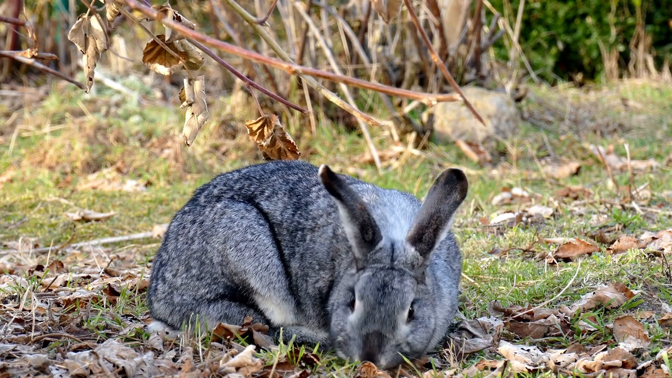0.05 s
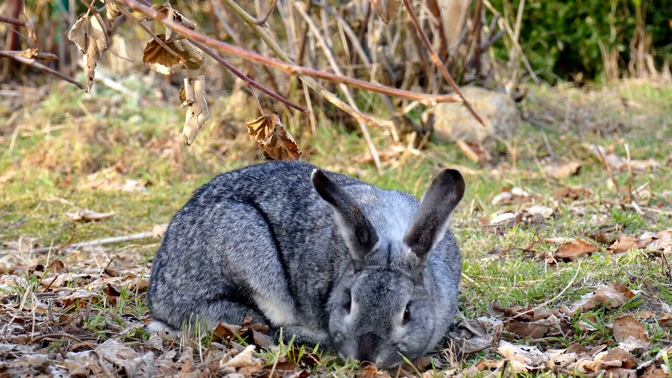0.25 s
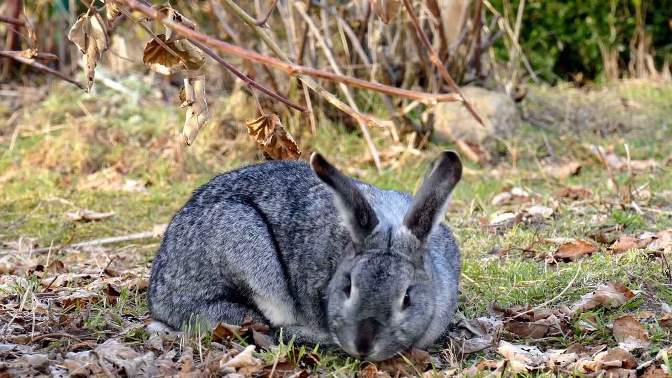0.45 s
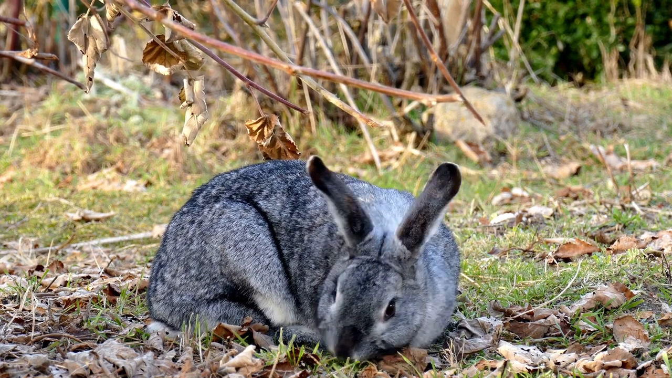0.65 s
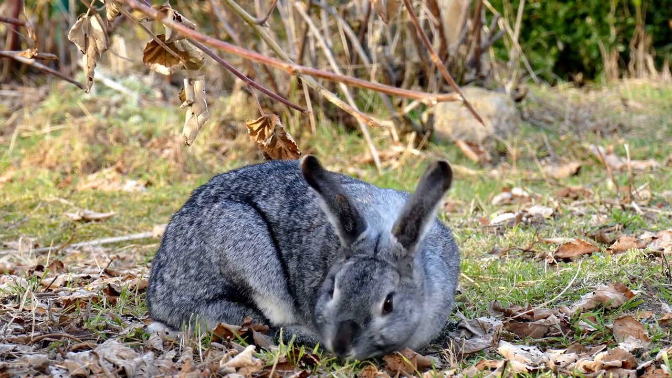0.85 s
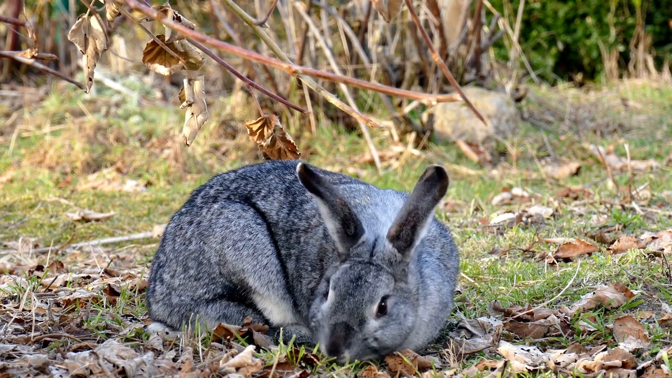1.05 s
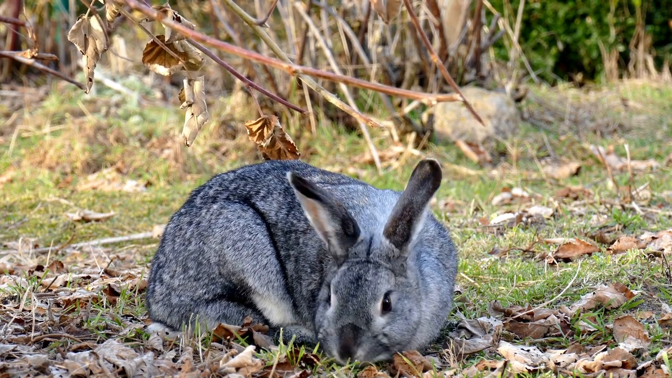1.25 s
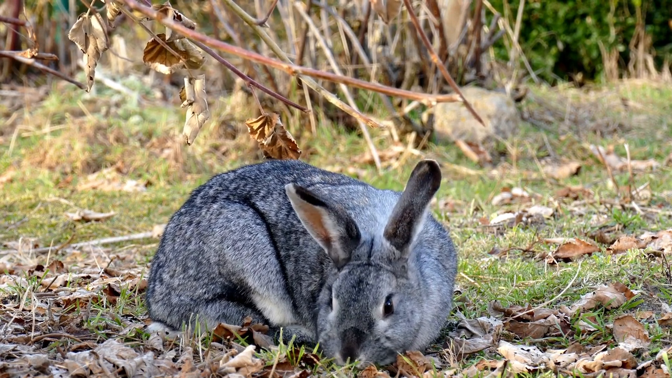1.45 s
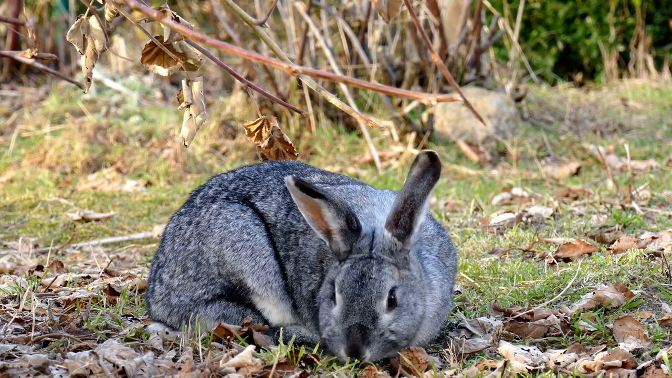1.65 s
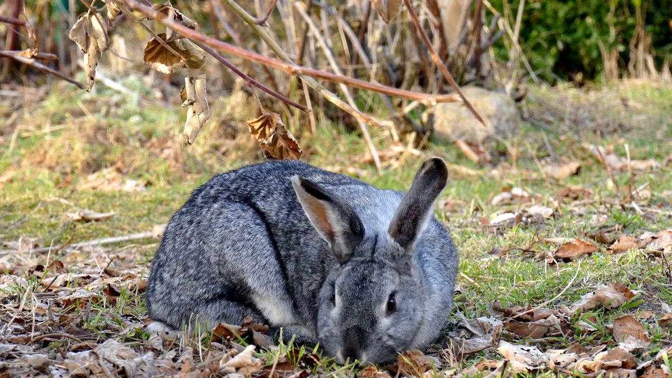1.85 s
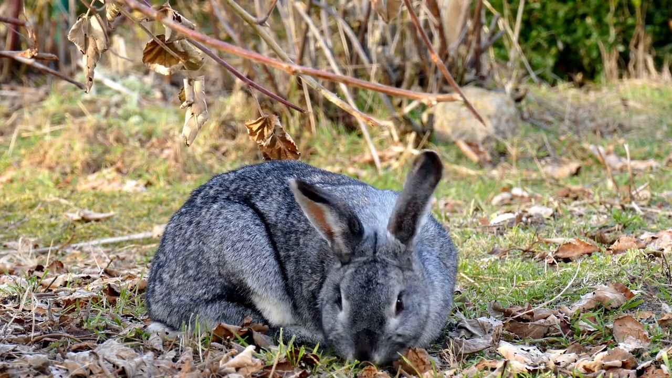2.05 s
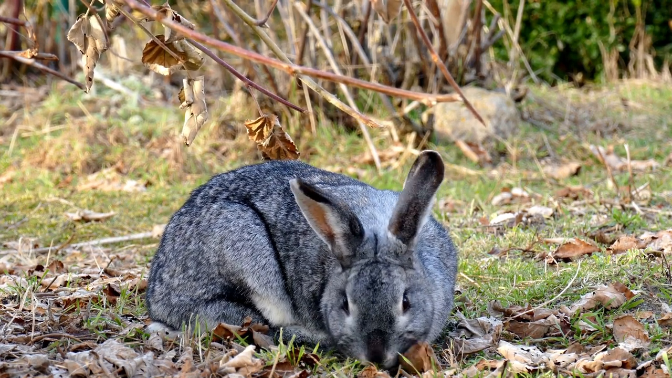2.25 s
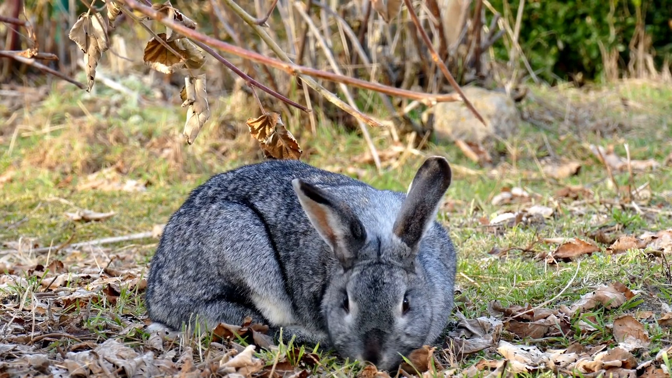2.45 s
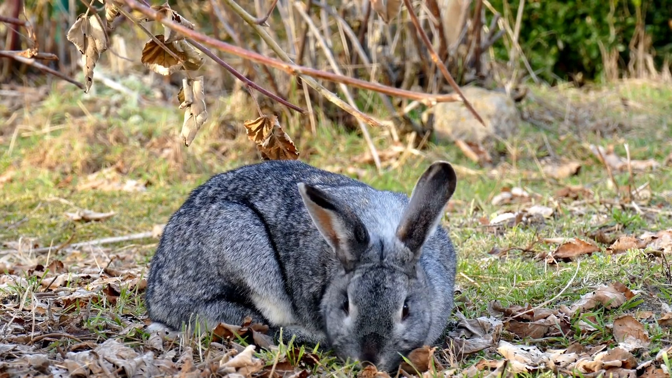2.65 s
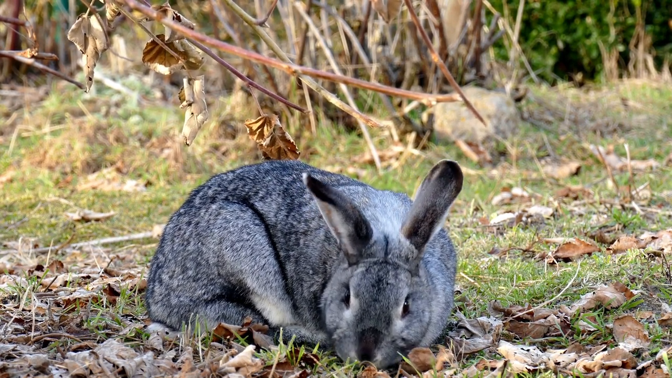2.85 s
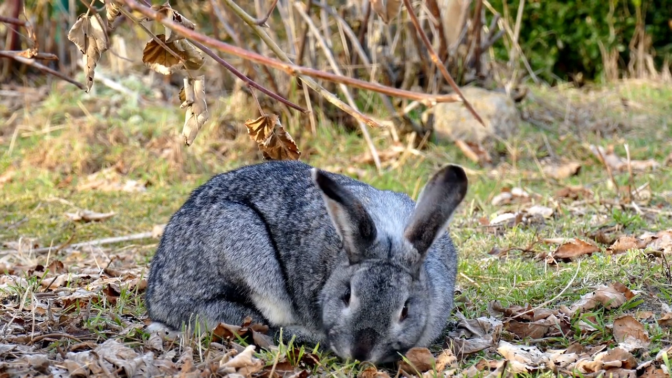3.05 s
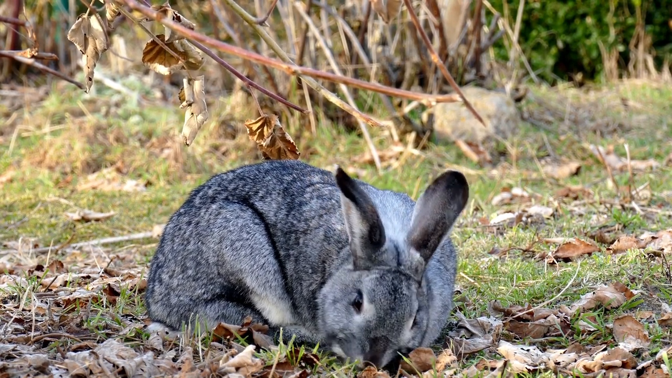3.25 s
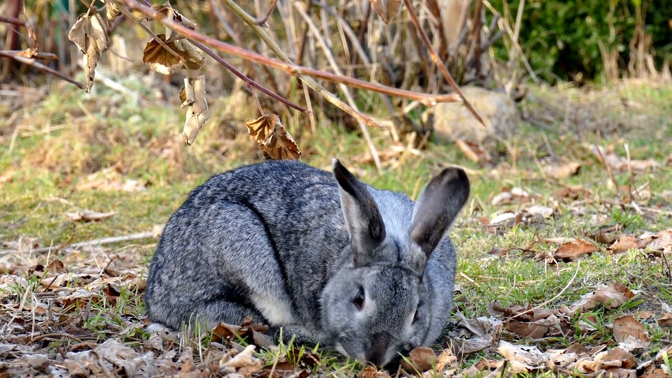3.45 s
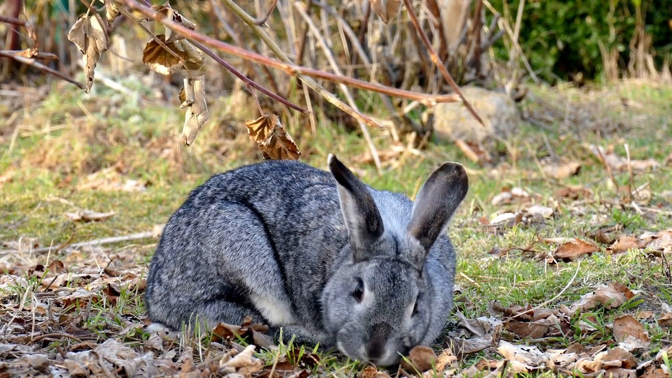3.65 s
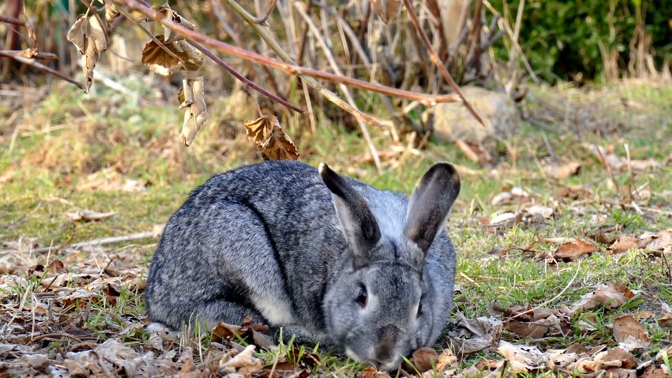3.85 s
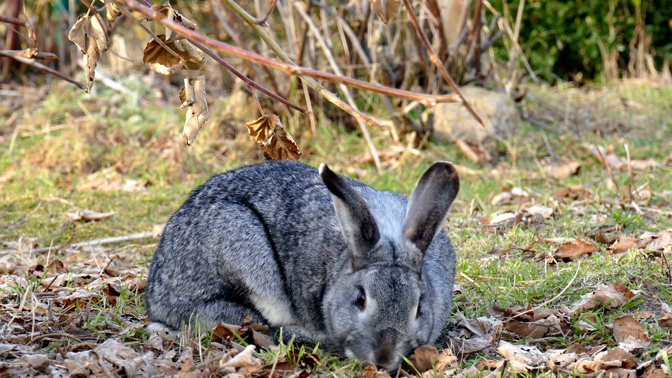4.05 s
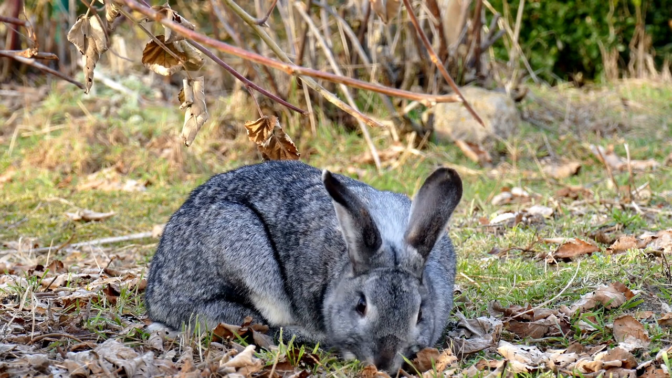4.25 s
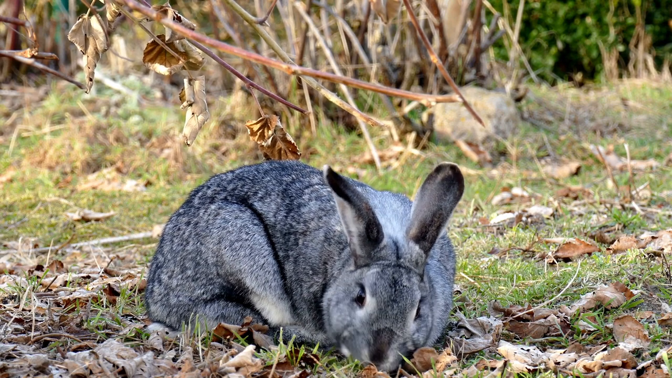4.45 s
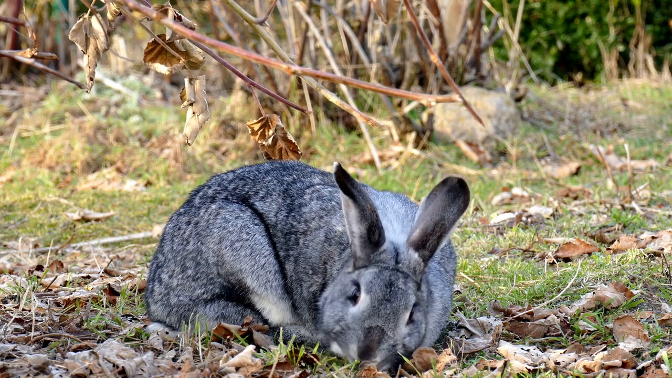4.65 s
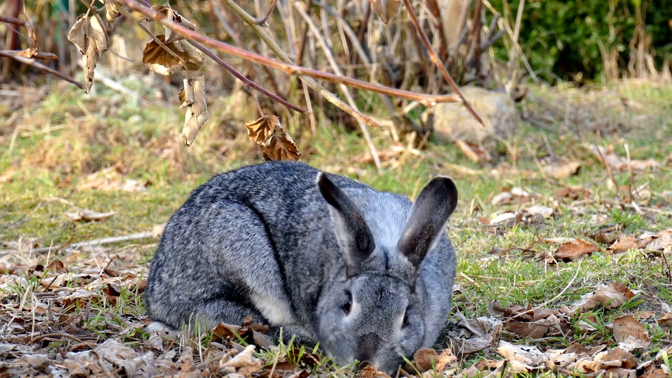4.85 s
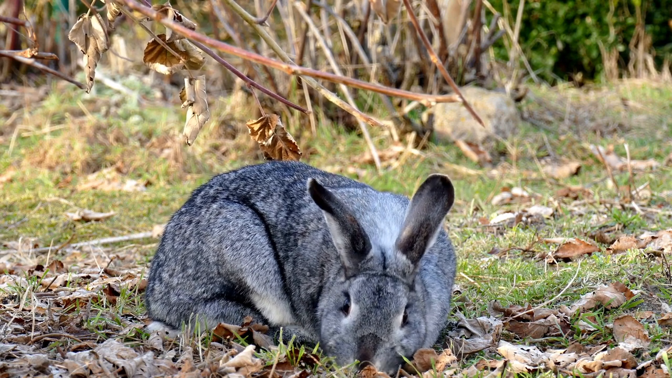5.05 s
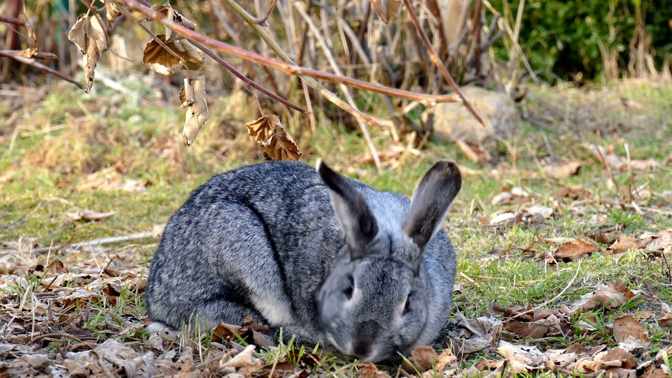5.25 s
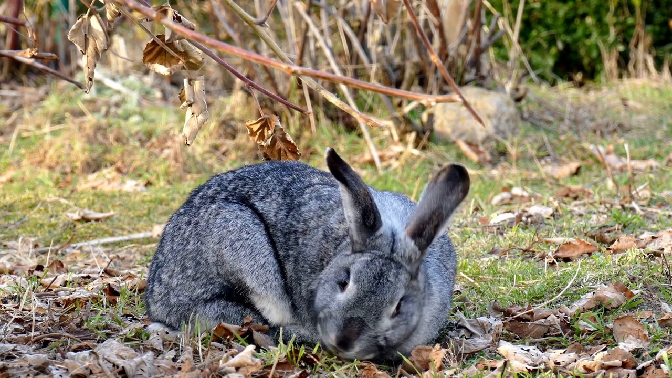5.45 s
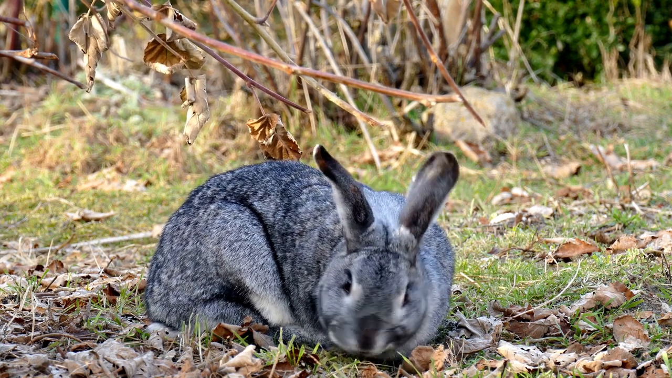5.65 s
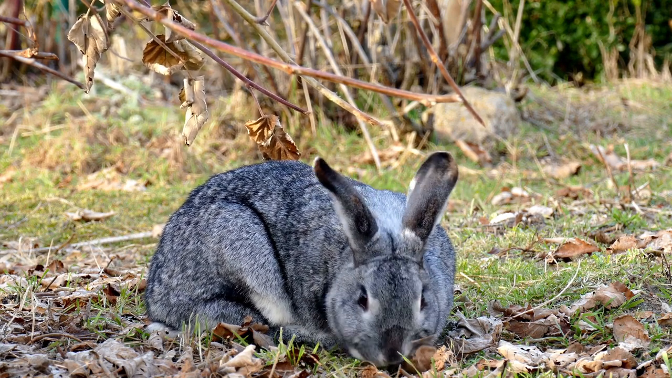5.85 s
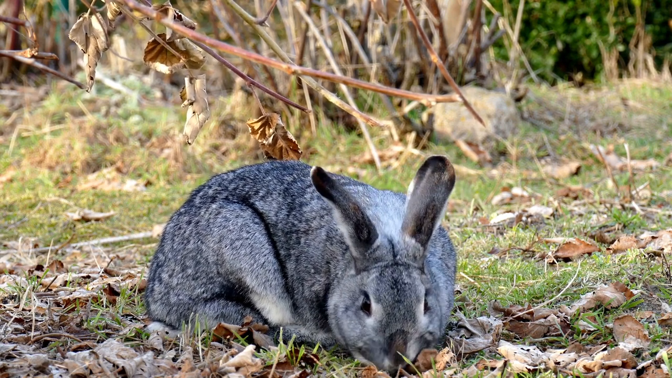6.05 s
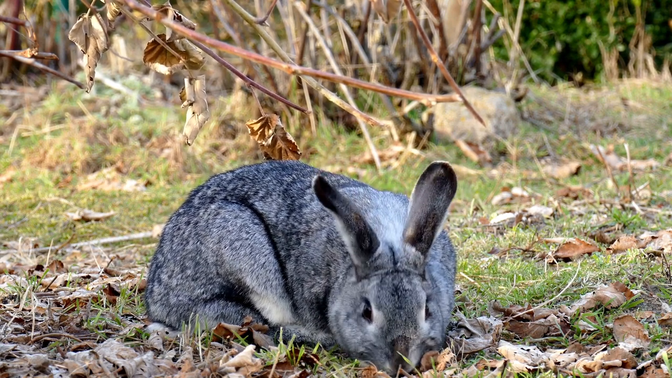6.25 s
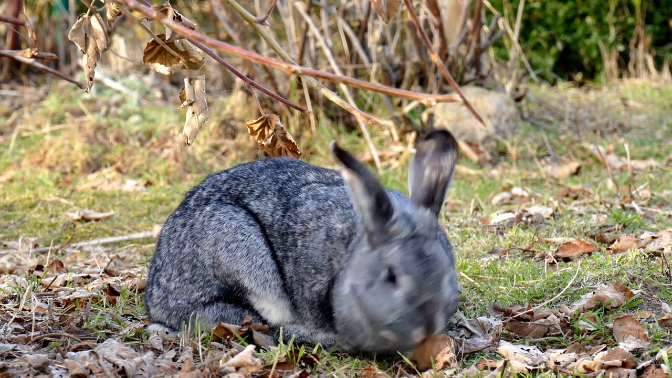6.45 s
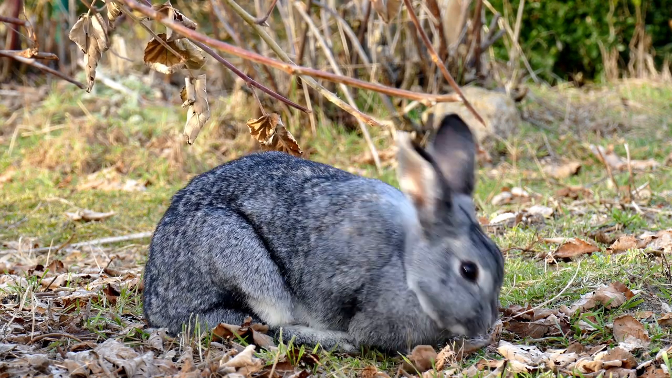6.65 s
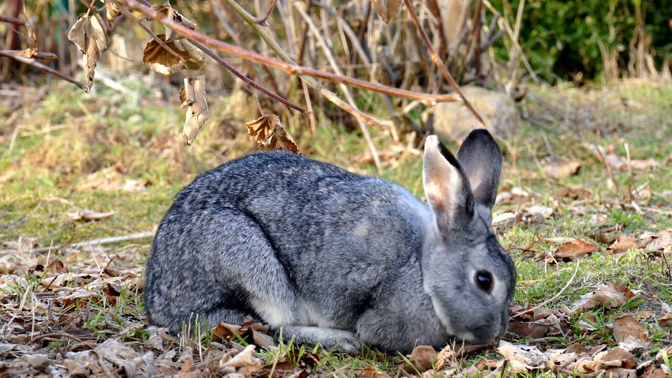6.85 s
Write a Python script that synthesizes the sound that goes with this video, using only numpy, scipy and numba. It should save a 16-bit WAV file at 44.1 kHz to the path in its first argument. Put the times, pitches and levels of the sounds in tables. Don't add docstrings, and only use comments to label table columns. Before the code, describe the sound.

Very close and central, a rabbit chews in an open garden over a faint, low hum of far traffic. From 0.2 s its bites come about every half second, each a gritty crunch of cracking stalk, grinding teeth and hollow mouth ring, with tiny ticks and dull jaw knocks between. Sharp snaps stand out near 0.3, 1.05, 1.55, 3.25 and 4.25 s. Thin trembling calls sound far away at the start. From 1.8 to 4.2 s a nearby warbler, slightly left, hurries through flicks, slides and a clear held note at 2.6 s. A distant whistler answers between 3 and 5.3 s. A very high thin trill runs 5.0-5.6 s. From 5.5 s the chewing turns softer, pulpier and quicker. A loud chatter bursts at 5.65 s, ending in a buzzing tremble around 6.1 s; bright sparrow chirps repeat from 6.3 s to the end.

```python
import sys
import numpy as np
from scipy import signal
from scipy.fft import rfft, irfft
from scipy.io import wavfile
from scipy.ndimage import uniform_filter1d, minimum_filter1d
from numba import njit

SR = 44100
rng = np.random.default_rng(int(sys.argv[2]) if len(sys.argv) > 2 else 0)


def rack_gain(trim_db):
    fader = np.asarray(trim_db, float)
    return 10 ** (fader / 20)


def pcm_store(signal):
    levels = np.round(np.clip(np.atleast_2d(signal), -1, 1) * 32767)
    wavfile.write(sys.argv[1], SR, levels.astype(np.int16).T)


N = 304731

SOFT_FOOD_S = 5.5
# (time [s], bright level [dB], body level [dB], mouth ring [dB])
STALK_TICKS = [(0.0373, -54, -60, -55), (0.172, -44, -59, -53), (0.1834, -43, -67, -51),
               (0.2111, -36, -65, -43.5), (0.4487, -49, -59, -65), (0.4614, -48, -67, -52),
               (0.606, -40, -39.5, -41), (0.645, -50, -57, -48), (0.655, -52, -60, -54),
               (0.674, -46, -52, -45), (0.688, -48, -52, -46), (0.6951, -46, -60, -40),
               (0.819, -58, -59, -60), (0.975, -47, -50.5, -60), (1.0205, -47, -53, -36.5),
               (1.1313, -33, -45, -37), (1.2262, -52, -43, -48), (1.253, -54, -50.5, -58),
               (1.3998, -44, -62, -49), (1.432, -51, -44, -60), (1.491, -52, -62, -45),
               (1.509, -39, -49, -35), (1.6, -32, -45, -34.5), (1.675, -32, -47, -43),
               (1.9588, -55, -47, -45), (1.9933, -43, -43, -52), (2.0083, -42, -49, -49),
               (2.095, -40, -47, -34), (2.107, -44, -56, -44), (2.1528, -42, -39, -33),
               (2.2147, -34, -29.5, -49), (2.525, -47, -54, -60), (2.5961, -45, -44, -41),
               (2.61, -34, -53, -40), (2.6442, -39.5, -63, -43), (2.6625, -45, -63, -46),
               (2.697, -38, -50, -36), (2.822, -46, -57, -64), (3.0139, -48, -50, -57)]
# (time [s], bright level [dB], body level [dB], mouth ring [dB])
LATER_TICKS = [(3.151, -45, -49, -41.5), (3.285, -29, -49, -32), (3.3739, -35, -47, -32.5),
               (3.384, -46, -45, -42), (3.399, -51, -53, -44), (3.4528, -42, -39, -40),
               (3.466, -31, -43, -33.5), (4.0124, -43, -49, -55), (4.0285, -50, -52, -52),
               (4.102, -43, -51, -45), (4.1206, -29, -52, -38), (4.174, -37, -46, -35),
               (4.205, -50, -50, -40), (4.2672, -48, -43, -45), (4.878, -36, -39, -47),
               (4.897, -36, -50, -40), (4.9396, -34.5, -47, -44), (5.063, -52, -47, -46),
               (5.107, -48, -41.5, -38), (5.6005, -38, -41, -34.5), (5.7835, -51, -33, -43),
               (5.8, -37, -38, -51), (5.885, -37, -45, -47), (5.9854, -56, -57, -37.5),
               (6.0055, -55, -52, -35), (6.0244, -41, -47, -32), (6.0461, -41, -43, -37),
               (6.0863, -44, -34.5, -29.5), (6.2047, -38, -60, -65), (6.4314, -39, -52, -37),
               (6.535, -46.5, -64, -58), (6.6346, -37, -49, -32.5), (6.832, -40, -65, -57)]
# (share of the length [0-1], share of the glide done [0-1], level [dB])
EVEN_SHAPE = [(0, 0, 1.5), (0.497, 0.6, -2.5), (0.998, 0.74, -3)]
# (share of the length [0-1], share of the glide done [0-1], level [dB])
FADING_SHAPE = [(0, 0, -3.5), (.5, .55, -3), (0.999, 1, -9)]


def rms_one(x):
    return x / np.sqrt(np.mean(x ** 2) + 1e-20)


def drift(rate):
    draws = rng.standard_normal(N // 50)
    return rms_one(np.interp(np.arange(N) * rate / SR, np.arange(N // 50), draws))


def stretch(rows):
    s, *columns = np.transpose(rows)
    at = np.arange(int(s[0] * SR), min(int(s[-1] * SR), N))
    return at, [np.interp(at / SR, s, c) for c in columns]


def fade(size, edge_s):
    k = np.arange(size)
    return np.sin(np.pi / 2 * np.clip(np.minimum(k, size - k) / (edge_s * SR), 0, 1)) ** 2


@njit
def swept_ring(x, turn, r):
    y = np.zeros(len(x))
    for i in range(2, len(x)):
        y[i] = np.sin(turn[i]) * x[i - 1] + 2 * r * np.cos(turn[i]) * y[i - 1] - r * r * y[i - 2]
    return y


def ring(x, hz, width_hz):
    return swept_ring(x, 2 * np.pi * hz / SR * np.ones(N), np.exp(-np.pi * width_hz / SR))


def treble_limit(x):
    return signal.sosfilt(signal.cheby2(18, 50, 12050, fs=SR, output="sos"), x)


def glides(rows, shape):
    return [[(s + length * a, from_hz + (to_hz - from_hz) * np.clip(b, 0, 1), db + c) for a, b, c in shape]
            for s, length, from_hz, to_hz, db in rows]


def song(notes, warble_hz, warble_rate, onset_s, flutter_db, octave_db):
    cycle = 2 * np.pi * np.cumsum(warble_rate * (1 + .25 * drift(60))) / SR
    out, flutter = np.zeros(N), rack_gain(flutter_db * np.tanh(drift(300)))
    for rows in notes:
        at, (hz, db) = stretch(rows)
        depth = warble_hz * np.minimum((at - at[0]) / (onset_s * SR), 1) ** 2
        phase = 2 * np.pi * np.cumsum(hz + depth * np.sin(cycle[at])) / SR
        overtones = np.sin(2 * phase) + np.sin(3 * phase)
        level = fade(len(at), .0025) * rack_gain(db + 2) * flutter[at]
        out[at] += level * (np.sin(phase) + rack_gain(octave_db) * overtones)
    return out


def garden(x, direct_db, near_db, far_db, pan_db, near_t60, far_t60):
    t = np.arange(SR // 2) / SR
    near, far = rng.standard_normal((2, 2, SR // 2)) * np.clip(t / 0.004, 0, 1)
    echo = rack_gain(near_db) * near * rack_gain(-60 * t / near_t60) + rack_gain(far_db) * far * rack_gain(-60 * t / far_t60)
    echo[:, 0] += rack_gain(direct_db)
    return signal.fftconvolve(x[None], echo, axes=1)[:, :N] * rack_gain(np.array([[pan_db], [-pan_db]]) / 2)


def hum():
    # (frequency [Hz], level [dB])
    spectrum = [(40, -9), (56, -1.5), (130, -13), (260, -23.5), (600, -12), (1050, -12.5), (1600, -21),
                (2300, -17), (2900, -26), (4500, -25), (8000, -33.5), (12900, -35)]
    # (frequency [Hz], correlation [0-1])
    likeness = [(60, 0.83), (130, 0.66), (250, 0.051)]
    hz = np.maximum(np.arange(N // 2 + 1) * SR / N, 1)
    gain, alike = [np.interp(np.log(hz), np.log(np.array(p)[:, 0]), np.array(p)[:, 1])
                   for p in (spectrum, likeness)]
    alike = np.clip(alike, 0, 1)
    mid, side = rfft(rng.standard_normal((2, N)))
    pair = rack_gain(gain) * (np.sqrt(1 + alike) * mid + np.sqrt(1 - alike) * side * [[1], [-1]])
    pair[:, hz > 13100] = 0
    return rack_gain(-52 + 1.19 * drift(3.555)) * rms_one(irfft(pair, N))


def far_callers():
    # (time [s], length [s], from pitch [Hz], to pitch [Hz], level [dB])
    thin_calls = [(.055, .145, 7100, 7200, -56), (.08, .12, 6750, 6800, -54), (.295, .095, 7100, 7450, -53),
                  (.34, .1, 6450, 6380, -56), (.0, .08, 3450, 3500, -63), (.3, .12, 8400, 7900, -64),
                  (.75, .035, 5200, 5120, -60), (1.745, .04, 3200, 3150, -58), (1.71, .07, 4250, 4500, -62),
                  (1.75, .03, 5200, 5350, -62), (1.75, .03, 3800, 3750, -61), (1.86, .05, 3550, 3250, -60)]
    # (time [s], length [s], from pitch [Hz], to pitch [Hz], level [dB])
    whistles = [
        (3.08, 0.039, 1870, 2160, -51),
        (3.47, 0.15, 2377, 1850, -48),
        (3.77, 0.1194, 1746, 1930, -52.5),
        (3.87, 0.11, 1925, 1834, -48),
        (4.29, 0.19, 2040, 2610, -49),
        (4.46, 0.043, 2604, 2440, -50),
        (4.57, 0.069, 2230, 2090, -45),
        (4.65, 0.17, 2080, 2086, -48),
        (4.89, 0.24, 1767, 1540, -54),
        (5.13, 0.15, 3770, 3750, -56),
    ]
    calls = song(glides(thin_calls, EVEN_SHAPE), warble_hz=330, warble_rate=60, onset_s=.03,
                 flutter_db=4, octave_db=-50)
    calls += song(glides(whistles, EVEN_SHAPE), warble_hz=20, warble_rate=30, onset_s=.05,
                  flutter_db=3, octave_db=-35)
    return garden(calls, direct_db=-5, near_db=-24, far_db=-33, pan_db=-2, near_t60=.15, far_t60=.8)


def ticks():
    s, bright_db, body_db, _ = np.transpose(STALK_TICKS + LATER_TICKS)
    t60_s = 0.012
    out, splinters = 0, rng.standard_normal((2, N))
    levels_db, bands_hz = (bright_db + 3.5, body_db + 18), ([5240, 11700], [1450, 4070])
    for noise, db, band_hz in zip(splinters, levels_db, bands_hz):
        clicks = np.full(N, 1e-18)
        clicks[(s * SR).astype(int)] = rack_gain(db)
        burst = signal.lfilter([1], [1, -rack_gain(-60 / (t60_s * SR))], clicks) * noise
        out = out + signal.sosfilt(signal.butter(2, band_hz, "band", fs=SR, output="sos"), burst)
    return treble_limit(out)


def bites():
    # (start [s], end [s], steady grinding level [dB])
    closings = [(0.165, 0.324, -65), (0.583, 0.721, -66), (1.009, 1.237, -61), (1.482, 1.683, -60),
                (1.961, 2.236, -61.5), (2.535, 2.727, -61.5), (3.153, 3.479, -61.5), (3.931, 4.285, -62.5),
                (4.799, 4.99, -58), (4.985, 5.129, -69), (5.58, 5.802, -67.5), (5.993, 6.139, -60),
                (6.192, 6.223, -61.5), (6.299, 6.46, -66), (6.54, 6.609, -58.5), (6.616, 6.781, -64.5),
                (6.829, 6.905, -63)]
    # (time [s], grinding level [dB], jaw thud level [dB])
    crushes = [(.273, -68, -73), (0.679, -65, -56), (1.078, -50.5, -48), (1.215, -81, -50),
               (1.56, -64, -58), (2.003, -58.5, -58), (2.095, -68, -72), (2.192, -69, -84),
               (2.574, -63, -60), (3.265, -48, -55), (3.382, -62, -58), (3.48, -64, -48.5),
               (4.048, -56, -68), (4.28, -56, -43), (4.826, -58.5, -54), (5.11, -58, -53),
               (5.598, -87, -45), (5.7, -52.5, -37.5), (5.81, -76, -40.5), (6.055, -56, -37),
               (6.345, -68, -38.5), (6.39, -62.5, -49), (6.676, -53, -35.5), (6.73, -53.5, -49)]
    crush_s, steady_thud_db, soft_food_rise = 0.034, 3, 1.9
    grind, thud, shut, t = np.zeros(N), np.zeros(N), np.zeros(N), np.arange(N) / SR
    s, grind_db, thud_db = np.transpose(crushes)
    for start, end, db in closings:
        at = np.arange(int(start * SR), int(end * SR))
        push = np.exp(-((t[at, None] - s) / crush_s) ** 2)
        grind[at] = fade(len(at), 0.0039) * (rack_gain(db) + push @ rack_gain(grind_db))
        thud[at] = fade(len(at), 0.011) * (rack_gain(db + steady_thud_db) + push @ rack_gain(thud_db))
        shut[at] = np.linspace(0, 1, len(at))
    return grind, thud, shut * np.where(t > SOFT_FOOD_S, soft_food_rise, 1)


def crackle():
    sizes = rack_gain(4.5 * np.minimum(rng.exponential(1, N), 3.0)) * rng.choice([-1, 1], N)
    clicks_per_s = 1100 * rack_gain(6 * drift(220))
    fibres = rms_one(sizes * (rng.random(N) < clicks_per_s / SR))
    pulp = np.where(np.arange(N) > SOFT_FOOD_S * SR, 1.5, .45)
    return (fibres + pulp * rms_one(sizes)) / np.sqrt(1 + pulp ** 2)


def chewing():
    # (time [s], crack level [dB], mouth ring [dB])
    cracks = [(0.268, -24, -43), (0.2839, -26.5, -12), (0.3106, -25.5, -27.5), (0.6131, -36, -28.5),
              (0.6609, -30.5, -31), (0.7171, -35, -50), (1.0538, -12.5, -40), (1.069, -19.5, -31),
              (1.098, -24, -42), (1.1083, -41, -27.5), (1.12, -32, -27.5), (1.146, -23.5, -25.5),
              (1.16, -23, -36), (1.1827, -42, -27), (1.2094, -39, -42), (1.5363, -23, -39),
              (1.5413, -13.5, -24), (1.548, -25, -39), (1.5863, -22, -31), (1.5908, -27, -29.5),
              (1.6689, -30, -28), (2.0811, -28, -32.5), (2.141, -28, -28), (2.1971, -33, -39),
              (2.2026, -25.5, -25.5), (2.2233, -35, -29.5),
              (3.208, -24, -65), (3.2231, -19.5, -42), (3.255, -49, -20), (3.268, -13, -27.5),
                   (3.333, -36, -33), (3.3513, -25, -43), (3.3595, -25, -23), (4.047, -26, -31),
                   (4.231, -45, -30.5), (4.2434, -32, -18.5), (4.275, -35.5, -25), (4.784, -46, -30),
                   (4.812, -30, -24), (4.8247, -20, -28.5), (4.853, -23, -64), (5.628, -51, -30),
                   (5.659, -54, -28), (5.6918, -55, -26), (5.7479, -33, -24), (6.335, -32.5, -57),
                   (6.3846, -25, -23), (6.6903, -39, -38)]
    # (frequency [Hz], width [Hz], level [dB], spread from crack to crack [dB])
    skull = [
        (1820, 1050, -2, -1.5),
        (3600, 1900, 4, 4),
        (4860, 530, -7, 12),
        (6860, 2530, 2.5, 1),
        (12300, 6400, 4.5, -5.5),
    ]
    # (time [s], level [dB])
    jaw_drops = [
        (0.981, -33.5),
        (1.428, -28),
        (1.89, -38),
        (1.25, -53),
        (2.43, -41),
        (5.52, -37),
        (5.893, -35),
        (6.51, -33),
    ]
    mouth_open_hz, mouth_shut_hz, mouth_width_hz = 1076, 1283, 73
    grind, thud, shut = bites()
    mouth_hz = mouth_open_hz + (mouth_shut_hz - mouth_open_hz) * shut + 25 * drift(40)
    fibres = crackle()
    s, crack_db, ring_db = np.transpose(cracks)
    at, luck = (s * SR).astype(int), np.tanh(rng.standard_normal((len(s), 8)))
    tear, splinters = np.exp(-1 / 70.0), rng.standard_normal(N)
    out = snaps()
    for k, (hz, width_hz, db, spread_db) in enumerate(skull):
        clicks = np.zeros(N)
        lean = k / (len(skull) - 1)
        clicks[at] = rack_gain(lean * crack_db + (1 - lean) * ring_db + spread_db * luck[:, k] - 7.0)
        torn = signal.lfilter([1], [1, -tear], clicks) * splinters
        ground = rack_gain(1.56 * drift(150)) * grind * fibres
        out += (-1) ** k * rack_gain(db) * ring(torn + ground, hz, width_hz)
    blows = np.zeros(N)
    blows[at] = -rack_gain(ring_db)
    for s, _, _, db in STALK_TICKS + LATER_TICKS:
        blows[int(s * SR)] -= rack_gain(db + 3)
    out += ring(rack_gain(-2.0) * blows + rack_gain(-12.5) * np.sqrt(grind * thud) * fibres, mouth_hz, mouth_width_hz)
    for s, db in jaw_drops:
        blows[int(s * SR):][:150] += rack_gain(db) * np.hanning(150) / 30
    out += ring(rack_gain(-4.5) * blows + rack_gain(-9.0) * thud * fibres, 203, 304)
    out += ring(rack_gain(-5.5) * blows + rack_gain(-22.5) * thud * fibres, 468, 540)
    out = signal.sosfilt(signal.butter(3, 85, "high", fs=SR, output="sos"), out)
    return treble_limit(out)


def snaps():
    # (time [s], peak level [dB], pitch [Hz])
    hard_snaps = [
        (0.2828, -17, 2200),
        (0.3083, -12, 2920),
        (3.2546, -16.5, 2310),
        (4.2435, -11.5, 3200),
        (4.7835, -23.5, 2795),
    ]
    out, t = np.zeros(N), np.arange(200) / SR
    for s, db, hz in hard_snaps:
        out[int(s * SR) + 30:][:200] += rack_gain(db - 60 * t / 0.0071) * np.sin(2 * np.pi * hz * t)
    return out


def warbler():
    # (time [s], length [s], from pitch [Hz], to pitch [Hz], level [dB])
    flicks = [(1.965, 0.019, 4900, 5460, -35), (2.0, 0.048, 3700, 4500, -26),
              (2.047, 0.018, 4470, 6450, -29.5), (2.108, 0.02, 4090, 5600, -32.5),
              (2.205, 0.06, 3920, 4790, -45), (2.322, 0.02, 3620, 4180, -29),
              (2.402, 0.017, 4470, 5410, -37.5), (2.419, 0.0096, 3500, 5620, -27),
              (3.318, 0.017, 3770, 4550, -29.5), (3.585, 0.0054, 3760, 4540, -36.5),
              (3.632, 0.019, 3080, 4750, -26), (3.739, 0.0126, 3510, 4720, -33.5),
              (3.78, 0.025, 3200, 4940, -29.5), (3.839, 0.018, 3090, 4830, -34.5),
              (4.005, 0.0057, 3640, 5170, -25.5)]
    # (time [s], length [s], from pitch [Hz], to pitch [Hz], level [dB])
    leads = [(1.805, 0.017, 5370, 4190, -47), (1.93, 0.01, 3700, 5330, -33.5),
             (1.98, 0.019, 4650, 3630, -35.5), (2.24, 0.072, 3640, 4180, -47),
             (2.518, 0.016, 3110, 4380, -30.5), (2.572, 0.011, 3130, 5310, -29.5),
             (2.595, 0.018, 5120, 4210, -20.5), (2.875, 0.025, 3900, 4500, -36.5),
             (2.885, 0.031, 6040, 7300, -57), (2.893, 0.042, 3300, 3600, -31),
             (3.03, 0.016, 3280, 2540, -36), (3.198, 0.0088, 2400, 3230, -29),
             (3.35, 0.0517, 2596, 2980, -34), (3.597, 0.015, 4020, 2800, -30.5),
             (3.754, 0.0118, 5600, 4250, -34.5), (3.767, 0.0107, 4840, 3300, -27.5),
             (4.012, .013, 4860, 3630, -22), (4.165, 0.0077, 4400, 5100, -32.5),
             (4.177, 0.017, 3444, 4110, -27.5)]
    # (time [s], length [s], from pitch [Hz], to pitch [Hz], level [dB])
    drops = [(1.942, 0.036, 5230, 4650, -33), (2.265, 0.046, 4705, 4830, -37), (2.2, .012, 4700, 4180, -42),
             (2.775, 0.016, 7290, 4600, -53.5), (2.787, 0.014, 4520, 3270, -29),
             (2.8, 0.019, 3200, 2320, -54), (2.805, 0.009, 3925, 3340, -24),
             (2.925, 0.037, 7180, 5770, -55), (2.93, .03, 3600, 2900, -24.5),
             (3.194, 0.0057, 3400, 3250, -34), (3.205, 0.022, 3370, 3010, -30),
             (3.238, .012, 3250, 2760, -36), (3.333, 0.015, 4420, 4440, -32),
             (3.43, 0.047, 3640, 2273, -35), (3.59, 0.029, 3380, 3190, -35.5),
             (3.655, 0.012, 4690, 3064, -28.5), (3.806, 0.0103, 4040, 3130, -25),
             (3.856, 0.0073, 4860, 2810, -28), (3.862, 0.014, 2950, 2870, -30.5),
             (3.876, 0.013, 2610, 2360, -40), (4.025, 0.026, 3846, 2915, -27),
             (4.08, 0.0093, 2980, 4010, -24), (4.09, 0.02, 3790, 2570, -35.5),
             (4.195, .02, 3980, 2420, -32)]
    # (time [s], length [s], from pitch [Hz], to pitch [Hz], level [dB])
    holds = [
        (1.822, 0.024, 4370, 4340, -40),
        (2.066, 0.016, 4280, 4350, -32),
        (2.335, .021, 4240, 4340, -45),
        (2.615, 0.18, 4300, 4049, -21.5),
        (3.233, 0.017, 3630, 3520, -27.5),
        (3.39, 0.05, 2967, 2937, -32),
        (4.05, 0.027, 3780, 3890, -25.5),
        (4.195, 0.042, 4030, 4005, -38),
    ]
    # (share of the length [0-1], share of the glide done [0-1], level [dB])
    rounding = [(0, 0.0067, -1), (.7, .88, -2), (1, 1, -6)]
    # (share of the length [0-1], share of the glide done [0-1], level [dB])
    swelling = [(0, 0.0029, -6.5), (0.498, 0.489, -8.5), (1, 1, 6)]
    # (share of the length [0-1], share of the glide done [0-1], level [dB])
    dying = [(0, 0.11, 2.5), (0.249, 0.765, -7), (.65, .95, -3), (1, 1, -72)]
    phrase = glides(flicks, rounding) + glides(leads, swelling)
    phrase += glides(drops, FADING_SHAPE) + glides(holds, dying)
    voice = song(phrase, warble_hz=20, warble_rate=120, onset_s=.02, flutter_db=1.2, octave_db=-40)
    return garden(voice, direct_db=1.04, near_db=-21.0, far_db=-35.5, pan_db=2.3, near_t60=0.1, far_t60=0.74)


def thin_triller():
    # (time [s], pitch [Hz], level [dB])
    trill = [
        (5.028, 8390, -54),
        (5.15, 8170, -36.5),
        (5.2, 7770, -35),
        (5.27, 7920, -36.5),
        (5.4, 8036, -37.5),
        (5.585, 8000, -44.5),
    ]
    # (time [s], length [s], from pitch [Hz], to pitch [Hz], level [dB])
    thin_rise = [
        (6.15, 0.18, 8430, 8810, -62),
        (6.3, 0.17, 9060, 8850, -59.5),
    ]
    voice = song([trill] + glides(thin_rise, EVEN_SHAPE), warble_hz=380, warble_rate=120, onset_s=.3,
                 flutter_db=7, octave_db=-38)
    return garden(voice, direct_db=-1.7, near_db=-20, far_db=-36.5, pan_db=-1.0, near_t60=0.086, far_t60=0.46)


def chatter():
    # (time [s], length [s], from pitch [Hz], to pitch [Hz], level [dB])
    short_notes = [(5.647, 0.011, 4610, 4440, -24.5), (5.66, 0.0095, 3440, 3010, -17.5),
                   (5.675, 0.017, 3915, 3920, -21), (5.691, 0.021, 3187, 3083, -12.5),
                   (5.708, 0.021, 2830, 2420, -34.5), (5.725, 0.031, 3104, 3000, -43),
                   (5.745, 0.024, 3300, 3130, -26.5), (5.758, 0.022, 3475, 2850, -20.5),
                   (5.768, 0.016, 2800, 2825, -23), (5.785, 0.035, 3600, 3694, -24.5),
                   (5.798, 0.0227, 3084, 2907, -21), (5.862, 0.015, 4220, 4350, -24.5),
                   (5.875, 0.012, 3770, 3000, -18.5), (5.967, 0.0081, 4380, 4490, -21),
                   (5.982, 0.03, 3600, 3200, -28.5)]
    # (time [s], length [s], from pitch [Hz], to pitch [Hz], level [dB])
    fading_notes = [
        (5.89, 0.0247, 3110, 3074, -23),
        (6.0, 0.038, 4440, 4450, -44),
    ]
    voice = song(glides(short_notes, EVEN_SHAPE) + glides(fading_notes, FADING_SHAPE), warble_hz=150, warble_rate=205,
                 onset_s=.05, flutter_db=3.5, octave_db=-36)
    return garden(voice, direct_db=-3.7, near_db=-24.5, far_db=-34.5, pan_db=-1.8, near_t60=0.087, far_t60=0.46)


def tremble():
    # (time [s], pitch [Hz], level [dB])
    long_note = [
        (6.0, 3290, -41),
        (6.075, 3366, -27.5),
        (6.15, 3357, -29.5),
        (6.2, 3300, -39.5),
        (6.27, 3260, -64),
    ]
    tremble_hz, trembles_per_s = 330, 203
    at, (hz, db) = stretch(long_note)
    out, cycle = np.zeros(N), 2 * np.pi * np.cumsum(trembles_per_s * (1 + .015 * drift(40))) / SR
    flutter_db = 1.2 * drift(250)[at]
    phase = 2 * np.pi * np.cumsum(hz + tremble_hz * np.sin(cycle[at])) / SR
    out[at] = fade(len(at), .005) * rack_gain(db + flutter_db) * np.sin(phase)
    return garden(out, direct_db=-1.5, near_db=-30, far_db=-38, pan_db=-1.6, near_t60=.12, far_t60=0.44)


def sparrow():
    # (share of the length [0-1], pitch [Hz], level [dB])
    upper = [(0, 5680, -6), (.16, 6570, -5.5), (0.451, 6250, -5.5), (.7, 5850, 1), (1, 5684, -5.5)]
    # (share of the length [0-1], pitch [Hz], level [dB])
    lower = [(0, 5015, 4), (.25, 4883, -9.5), (.65, 4902, 4.5), (.83, 4200, -3.5), (1.001, 2770, -20.5)]
    # (time [s], length [s], level [dB])
    upper_chirps = [
        (6.311, 0.081, -14.5),
        (6.461, 0.096, -14.5),
        (6.629, .085, -14),
        (6.811, 0.043, -22.5),
    ]
    # (time [s], length [s], level [dB])
    lower_chirps = [
        (6.346, 0.056, -14.5),
        (6.497, 0.068, -13),
        (6.696, 0.051, -12.5),
    ]
    # (time [s], length [s], from pitch [Hz], to pitch [Hz], level [dB])
    broken_chirp = [
        (6.834, 0.039, 5900, 2770, -21),
        (6.878, 0.0402, 5300, 4750, -18.5),
        (6.872, 0.045, 3600, 4500, -21.5),
    ]
    notes = [[(s + length * a, hz, db + c) for a, hz, c in shape]
             for shape, rows in ((upper, upper_chirps), (lower, lower_chirps)) for s, length, db in rows]
    voice = song(notes + glides(broken_chirp, FADING_SHAPE), warble_hz=190, warble_rate=280, onset_s=.02,
                 flutter_db=2.5, octave_db=-55)
    return garden(voice, direct_db=-8.0, near_db=-26.5, far_db=-40.0, pan_db=-0.88, near_t60=0.15, far_t60=0.56)


def scene():
    birds = far_callers() + warbler() + thin_triller() + chatter() + tremble() + sparrow()
    return hum() + ticks() + chewing() + birds


def top_cut(x):
    return signal.sosfilt(signal.butter(12, 15700, fs=SR, output="sos"), x)


def record(dry):
    room_left = np.minimum(.8 / (np.abs(dry).max(axis=0) + 1e-20), 1)
    gain = uniform_filter1d(minimum_filter1d(room_left, size=200), size=200)
    return top_cut(gain * dry)


dry = scene()
out = record(dry)
pcm_store(out)
```